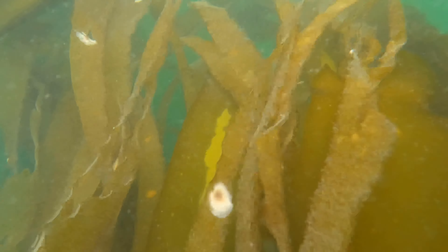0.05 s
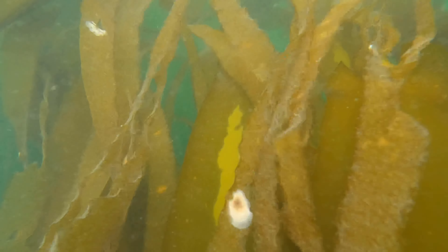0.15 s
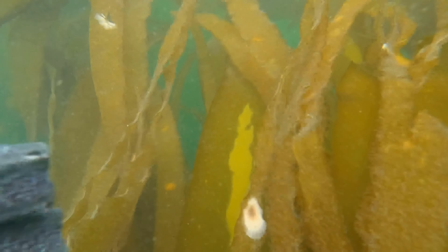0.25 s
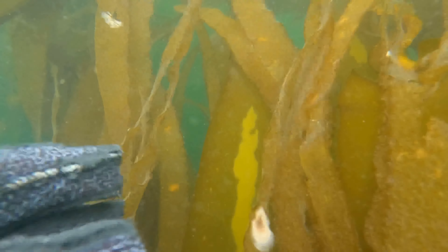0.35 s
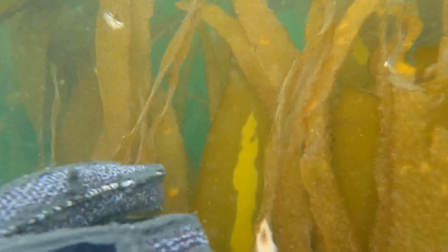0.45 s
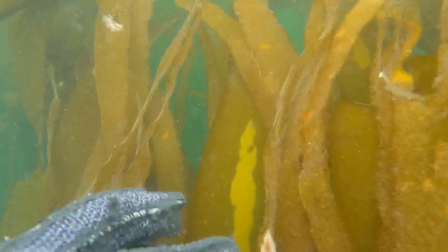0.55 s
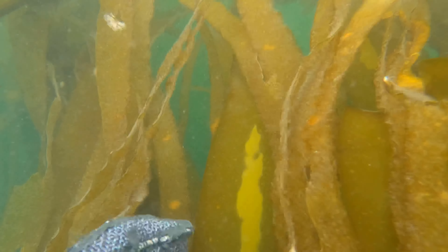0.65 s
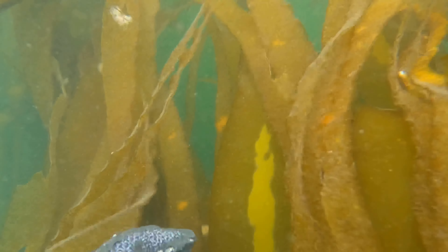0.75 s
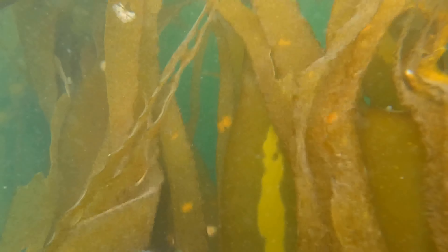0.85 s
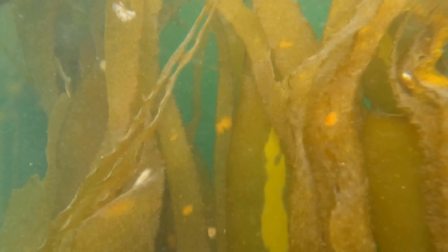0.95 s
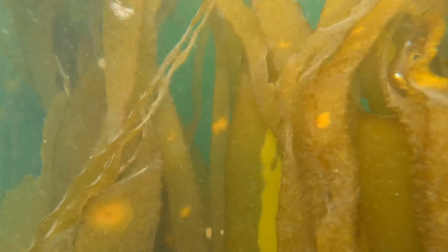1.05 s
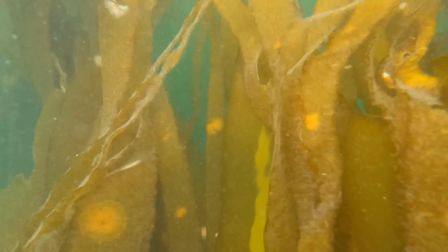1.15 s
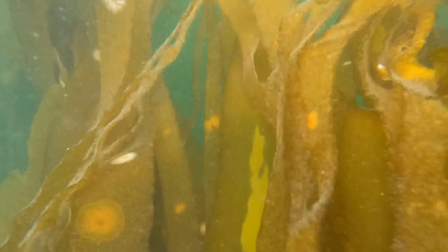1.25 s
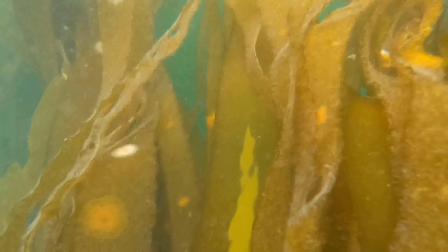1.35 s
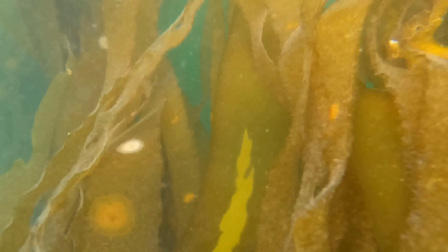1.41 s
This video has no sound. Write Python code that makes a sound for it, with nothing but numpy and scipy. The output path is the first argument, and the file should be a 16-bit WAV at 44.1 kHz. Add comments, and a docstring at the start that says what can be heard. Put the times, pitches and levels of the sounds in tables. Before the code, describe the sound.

Low, muffled underwater pressure noise swells and sags against a camera's casing. Early scraping and soft thuds give way to big, slow lurches, then harder, short hollow knocks in the middle and fainter bumps and bloops toward the end. A faint, fast electronic buzz, flow hiss and thin high whine persist underneath. The sound cuts out for an instant past four seconds. Microphones sit inside the housing, with no open-air space.

```python
"""Under water among kelp, a small camera in a sealed housing drifts along.
Water surges and lurches push on the housing: shaped noise and short swings make a deep lumpy rumble.
Fronds and gear knock and scuff on it, ringing decaying shell modes. The camera's electronics tick in step with
the picture rate through resonances, over hiss, flow noise and a thin whirr and whine. The sound drops out once."""
import sys
import numpy as np
from scipy import signal
from scipy.fft import rfft, irfft
from scipy.io import wavfile
from scipy.ndimage import uniform_filter1d

SR = 44100
rng = np.random.default_rng(int(sys.argv[2]) if len(sys.argv) > 2 else 0)


def persist_wave(psi):
    """Save psi, clipped to +-1, as 16-bit WAV."""
    counts = np.round(np.clip(psi, -1, 1) * 32767).astype(np.int16)
    wavfile.write(sys.argv[1], SR, np.atleast_2d(counts).T)


N = 270024

# water pushing on the housing: t/s, deep surge level/dB, throb level/dB, gurgle level/dB
SURGE = [(0, -19, -45.5, -43), (.3, -24, -40.5, -47), (1.05, -16.5, -33, -40.5), (1.9, -21, -31.5, -49),
         (2.8, -15, -37.5, -42.5), (3.3, -17.5, -30, -43.5), (3.65, -21.5, -36.5, -43),
         (4.75, -24, -34.5, -43.5), (5.75, -18, -27.5, -44), (6.0, -16, -31.5, -42.5)]
# steady sources: t/s, electronics level/dB, low-cavity flow level/dB, whirr level/dB, whine level/dB
STEADY = [(0, -50.5, -50, -73, -63), (.42, -47.5, -60.5, -62, -61), (.8, -45, -51, -63, -62),
          (1.27, -42.5, -50.5, -71, -59), (2.3, -42.5, -49, -69, -57.5), (3.2, -43, -48, -56.5, -53),
          (4.22, -42, -49.5, -54.5, -59.5), (4.27, -44, -52.5, -62, -62), (5.37, -42.5, -56, -69.5, -55),
          (6.12, -43.5, -56, -68, -57)]
# dropout: start/s, end/s
GAP_START_S, GAP_END_S = (4.2403, 4.2500)


def amp(db):
    """Gain of a level in dB."""
    return 10 ** (np.asarray(db) / 20)


def evened(x):
    """Scaled to rms 1."""
    return x / np.sqrt(np.mean(x ** 2) + 1e-20)


def read(points, hz):
    """A spectrum table read on a log-frequency axis."""
    f, value = np.transpose(points)
    return np.interp(np.log(hz + 1), np.log(f + 1), value)


def level(table, column):
    """One dB column of a curve as a gain per sample."""
    rows = np.array(table)
    return amp(np.interp(np.arange(N) / SR, rows[:, 0], rows[:, column]))


def slow_noise(*widths):
    """Noise smoothed by running means of these widths in samples, rms 1."""
    x = rng.standard_normal(N)
    for width in widths:
        x = uniform_filter1d(x, width)
    return evened(x)


def through(x, modes, skirt):
    """Causal minimum-phase filter made of steep resonances; output rms 1."""
    hz = abs(np.fft.fftfreq(8192, 1 / SR))
    power = sum(amp(2 * db) / (1 + (2 * (hz - f) / w) ** 2) ** skirt for f, w, db in modes)
    log_gain = np.log(power + 1e-10) / 2
    min_phase = -signal.hilbert(log_gain).imag
    taps = np.fft.ifft(np.exp(log_gain + 1j * min_phase)).real
    return evened(signal.oaconvolve(x, taps[:4096])[:N])


def rush():
    """Flickering flow noise excites low cavity resonances; a wavering whirr and a blurred whine lie above it."""
    # low cavity resonances: f/Hz, width/Hz, level/dB
    low_cavity = [(527.6, 94, 0), (597, 79, -1), (717, 78, -4)]
    whirr_hz, whine_start_hz, wander_rms_hz = 2619, 5314, 24.64
    whine_sag_hz_per_s = 51

    flicker_db = 1.4 * slow_noise(600)
    flow = amp(flicker_db) * rng.standard_normal(N)
    low = level(STEADY, column=2) * through(flow, low_cavity, skirt=1.72)

    wander_hz = wander_rms_hz * slow_noise(600, 600)
    whirr_phase = 2 * np.pi * np.cumsum(whirr_hz + wander_hz) / SR
    whirr = evened((3.1 + slow_noise(250)) * np.sin(whirr_phase))

    whine_hz = whine_start_hz - whine_sag_hz_per_s * np.arange(N) / SR + wander_hz
    whine = evened(slow_noise(200) * np.sin(2 * np.pi * np.cumsum(whine_hz) / SR))
    return low + level(STEADY, column=3) * whirr + level(STEADY, column=4) * whine


def electronics():
    """Picture-clock ticks, each a rattle of clicks plus a noise puff, and hiss excite the cavity resonances."""
    # cavity resonances: f/Hz, width/Hz, level/dB
    cavity = [(1126, 180, -5.5), (1710, 575, 4.5), (2510, 460, -3), (3284, 590, -5), (4634, 425, -1.5),
              (5806, 344, -4.5), (6546, 380, -7.5), (7175, 167, -8), (8850, 610, -23)]
    ticks_per_s, first_tick_s = 120 / 1.001, .0042
    limp_s, jitter_rms_s, size_rms_db = 0.0001053, .00001, 0.99

    k = np.arange(int(N / SR * ticks_per_s) - 2)
    tick_s = first_tick_s + k / ticks_per_s - limp_s * (-1) ** k  # alternately early and late
    tick_s = tick_s + (tick_s > GAP_START_S) * (GAP_END_S - GAP_START_S)  # the gap delays the clock
    wobble, size = rng.standard_normal((len(k), 2)).T
    place = (tick_s + jitter_rms_s * wobble)[:, None] * SR
    at = place.astype(int) + np.arange(-8, 9)
    clicks = np.zeros(N)
    clicks[at] = amp(size_rms_db * size[:, None]) * np.sinc(at - place) * np.hanning(17)  # between samples

    strokes = np.zeros(100)
    strokes[[0, 24, 52]] = .7, 1, .6
    rattle = evened(np.convolve(clicks, strokes)[:N])

    t = np.arange(300) / SR
    puff_swell = np.convolve(abs(clicks), t * np.exp(-t / 0.00079))[20:N + 20]
    puffs = evened(puff_swell * rng.standard_normal(N))
    hiss = rng.standard_normal(N)
    drive = amp(-1.0) * rattle + amp(2.5) * puffs + amp(2.0) * hiss
    return level(STEADY, column=1) * through(drive, cavity, skirt=1.216)


def ring(hz, octaves):
    """Shell modes weighted by nearness to the struck spot's pitch, decaying; peak 1."""
    # shell modes: f/Hz, decay scale/s (60 dB down at 0.76 of it)
    shell = [(270, 0.01), (350, 0.011), (500, 0.028), (610, 0.026), (765, 0.032), (1152, 0.037),
             (1615, 0.025), (1798, 0.018), (2300, 0.011), (2595, 0.012), (5600, 0.0057), (11500, 0.0046)]
    t = np.arange(4000) / SR
    out = np.zeros(4000)
    for f, decay_s in shell:
        weight = np.exp(-.5 * (np.log2(f / hz) / octaves) ** 2)
        decay = amp(-60 * (t / (0.76 * decay_s)) ** 1.94)
        out += weight * decay * np.sin(2 * np.pi * f * t)
    out = out * (1 - np.exp(-t / 0.00058))  # soft onset
    return out / abs(out).max()


def scuffs():
    """A frond drags past in a grainy run of tiny touches that ring the low modes of the shell."""
    # fronds sliding along the housing: start/s, length/s, level/dB
    slides = [(.01, 0.2, -33.5), (0.69, 0.1, -41), (1.305, 0.12, -40), (4.276, 0.15, -34),
              (5.004, 0.1, -41), (5.728, 0.22, -42)]
    touches_per_s = 360
    weight = np.zeros(N)
    for start_s, length_s, db in slides:
        length = round(length_s * SR)
        weight[round(start_s * SR):][:length] += amp(db) * np.hanning(length)
    touches = (rng.random(N) < touches_per_s / SR) * rng.standard_normal(N)
    return signal.oaconvolve(weight * touches, ring(330, octaves=0.25))[:N]


def knocks(stir):
    """Each blow rings the shell and gives it a short low shove; many faint ones come by chance."""
    # knocks on the housing: t/s, level/dB, struck-spot f/Hz, shove beside the ring/dB
    blows = [(0.134, -25.5, 400, -10), (0.317, -27.5, 388, -16.5), (0.381, -47.5, 253, 18),
             (0.911, -30, 342, -16), (1.06, -46.5, 250, 24.5), (1.326, -26.5, 335, -18),
             (1.402, -36, 720, 5.5), (1.625, -28, 514, 4), (1.628, -24, 805, -4), (1.757, -40.5, 247, 14),
             (1.943, -45, 239, 20), (2.465, -35.5, 250, 14), (2.875, -26.5, 546, -2),
             (3.265, -23, 560, 2.5), (3.357, -28, 343, -2), (3.367, -17, 512, -26), (3.652, -33, 248, 1),
             (3.748, -17.5, 765, -8.5), (3.78, -30.5, 473, -5.5), (4.02, -21.5, 660, -7.5),
             (4.25, -33.5, 260, -11.5), (4.301, -32, 262, 1.5), (4.354, -33, 443, -5),
             (4.859, -32, 328, 5.5), (4.985, -34, 620, -21), (5.036, -32, 368, -39), (5.161, -34, 377, -20),
             (5.534, -35, 580, -4), (5.567, -28.5, 540, -2.5), (5.755, -35.5, 367, -3.5),
             (5.778, -32.5, 330, 7), (5.948, -35, 680, -12)]
    # short taps, faint to strong, on the higher modes: t/s, peak level/dB, f/Hz
    taps = [(2.877, -30.5, 2800), (2.939, -16, 1705), (3.267, -37, 1290), (3.368, -30, 7800),
            (3.648, -35, 1390), (3.86, -30, 1194)]
    drag_touches_per_s, faint_per_s = 500, 40

    out, t = np.zeros(N + 4000), np.arange(4000) / SR
    shove = np.sin(2 * np.pi * 150 * t) * amp(-60 * t / 0.022) * (1 - np.exp(-t / 0.0045))
    shove /= abs(shove).max()
    contact = 0.38 * np.exp(-t / 0.011)  # the first touch briefly stirs a wider spread of modes
    for s, db, hz, shove_db in blows:
        blow = ring(hz, octaves=0.23) + contact * ring(1.01 * hz, octaves=0.33) - amp(shove_db) * shove
        # dull blows come from soft fronds, which drag on in a ragged cluster of touches
        touches = (rng.random(4000) < drag_touches_per_s / SR) * rng.uniform(0.076, 1, 4000)
        drag = np.exp(-t / (0.0063 * (300 / hz) ** 2)) * touches
        drag[60] = 1  # one sure touch
        drag /= np.linalg.norm(drag)
        out[round(s * SR):][:4000] += amp(db) * signal.oaconvolve(blow, drag)[:4000]
    for s, db, hz in taps:
        out[round(s * SR):][:4000] += amp(db) * ring(hz, octaves=0.29)

    # faint blows are stronger where the water gurgles
    size = amp(2.64 * np.minimum(rng.exponential(1, N), 2)) * rng.choice([-1, 1], N)
    faint = (rng.random(N) < faint_per_s / SR) * size
    faint = amp(-8.0) * faint * (level(SURGE, column=3) + 0.46 * stir)
    return out[:N] + signal.oaconvolve(faint, ring(380, octaves=0.46) - 0.51 * shove)[:N]


def water(spectrum, steadiness, lump_s):
    """Coloured noise, its chance swells pressed flat (steadiness > 0) or deepened into lumps (< 0); rms 1."""
    hz = np.fft.rfftfreq(N, 1 / SR)
    x = evened(irfft(rfft(rng.standard_normal(N)) * amp(read(spectrum, hz)), N))
    width = round(lump_s * SR)
    swell = uniform_filter1d(uniform_filter1d(x ** 2, width), width)
    return evened(x / (abs(swell) + .03) ** (steadiness / 2))


def rumble(stir):
    """Water pressure noise in three bands, the gurgle raised by what the lurches stir up."""
    # relative noise spectra: f/Hz, density level/dB
    deep_spectrum = [(4, -20), (11, 1), (16, 0), (25, -2), (40, -5), (50, -12), (200, -120)]
    throb_spectrum = [(30, -45), (45, -41), (65, -3), (80, -17.5), (95, -35.5), (300, -120)]
    gurgle_spectrum = [(70, -51.5), (100, 7), (135, -1.5), (200, -4), (280, -17), (420, -16.5),
                       (650, -29.5), (2000, -100)]
    deep = level(SURGE, column=1) * water(deep_spectrum, steadiness=0.16, lump_s=0.049)
    throb = level(SURGE, column=2) * water(throb_spectrum, steadiness=-0.15, lump_s=0.024)
    gurgle_gain = level(SURGE, column=3) + stir
    return deep + throb + gurgle_gain * water(gurgle_spectrum, steadiness=-0.82, lump_s=0.023)


def lurches():
    """Each lurch is a few swings that swell and fade; returns them and the gurgle level that they stir up."""
    # lurches of water on the housing, deep heaves to small bloops: middle/s, level/dB, f/Hz
    heaves = [(0.247, -16.5, 31), (0.721, -37.5, 114), (1.077, -14.5, 60), (1.081, -28, 37),
              (1.461, -13, 29.7), (1.573, -8, 19.4), (1.659, -21, 51), (1.976, -13, 55.4),
              (2.052, -14.5, 23), (2.362, -11, 26), (2.633, -19.5, 48), (2.689, -15, 59), (2.723, -27, 104),
              (2.827, -14.5, 11), (3.051, -13.5, 21), (3.212, -24, 14), (3.33, -17.5, 39),
              (3.503, -16, 24.7), (4.364, -19, 68), (4.364, -12, 34.3), (4.888, -15.5, 45),
              (4.899, -28, 65), (5.077, -20, 62), (5.138, -33.5, 140), (5.195, -28, 103),
              (5.298, -35.5, 134), (5.38, -17, 26), (5.697, -21.5, 40), (5.784, -16, 60), (5.848, -13, 64),
              (5.85, -10, 28.9), (5.984, -15, 29)]
    swings_at_60hz, swings_grow = 2.14, 0.3  # swings above half strength; exponent over pitch
    glide = 0.1  # upward pitch slide, stronger for higher lurches
    stir_db, stir_tilt = -24, 3.3  # gurgle beside a 60 Hz lurch; exponent over pitch

    swings, stir = np.zeros(N + SR), np.zeros(N + SR)
    t = np.arange(-SR // 5, SR // 5) / SR
    for (s, db, hz), phase in zip(heaves, rng.random((len(heaves), 1))):
        pitch_ratio = hz / 60
        swing_count = swings_at_60hz * pitch_ratio ** swings_grow
        swell = amp(db) * 2 ** -(2 * t * hz / swing_count) ** 2
        cycles = hz * t * (1 + glide * pitch_ratio * np.tanh(hz * t / 4)) + phase
        start = round(s * SR)
        swings[start:][:len(t)] += np.sqrt(2) * swell * np.cos(2 * np.pi * cycles)
        stir[start:][:len(t)] += amp(stir_db) * pitch_ratio ** stir_tilt * swell
    return swings[SR // 5:][:N], stir[SR // 5:][:N]


def ports(shared, own):
    """Two microphone ports behind the wall, unlike in level and phase; the right mixes in noise of its own."""
    # likeness of the ports: f/Hz, share of amplitude in common
    likeness = [(60, .996), (350, .91), (800, .94), (950, .5), (1200, .85), (2000, .95), (4000, .85),
                (4700, .99), (7500, .99), (12000, .5)]
    # level difference: f/Hz, left minus right/dB
    lean = [(20, -.9), (210, 0), (520, 4.5), (750, 7), (1050, -6), (1700, 4), (2600, 5), (4000, -1),
            (5000, -.5), (12000, 2)]
    # phase difference: f/Hz, left ahead/rad
    lead = [(200, -.05), (520, -.12), (600, -.6), (850, -1.1), (1160, .35), (1400, -.5), (3400, -.8),
            (4100, -1.2), (4700, 0)]
    # band swallowed by the wall: f/Hz, Gaussian width/Hz, share lost
    hollow_hz, hollow_width_hz, hollow_share = (935, 85, 0.62)
    wall_top_hz = 10000

    hz = np.fft.rfftfreq(N, 1 / SR)
    same = np.clip(read(likeness, hz), 0, 1)
    tilt = amp(read(lean, hz) / 2) * np.exp(.5j * read(lead, hz))
    left = tilt * rfft(shared)
    right = (same * rfft(shared) + np.sqrt(1 - same ** 2) * rfft(own)) / tilt
    wall = 1 - np.clip(hollow_share, 0, 1) * np.exp(-.5 * ((hz - hollow_hz) / hollow_width_hz) ** 2)
    wall = wall / (1 + (hz / wall_top_hz) ** 5.15)
    mid_gain = 2 / abs(tilt + 1 / tilt)  # offsets the tilt's effect on the sum of the ports
    return irfft(wall * np.array([left, right]) * mid_gain, N)


def scene():
    """All sources reach both ports through the housing."""
    swings, stir = lurches()
    touched = swings + knocks(stir) + scuffs()
    shared = touched + rumble(stir) + electronics() + rush()
    own = rumble(stir) + electronics() + rush()
    return ports(shared, own)


def record(dry):
    """The dropout cuts off hard and fades back in quickly; then the band limit."""
    t = np.arange(N) / SR
    before = np.clip((GAP_START_S - t) / .0001, 0, 1)
    after = np.clip((t - GAP_END_S) / 0.001 + .5, 0, 1)
    edge_hz = 13800
    low_pass = signal.firwin(511, edge_hz, window=("kaiser", 9), fs=SR)
    return signal.oaconvolve(dry * np.maximum(before, after), low_pass[None], "same")


dry = scene()
out = record(dry)
persist_wave(out)
```